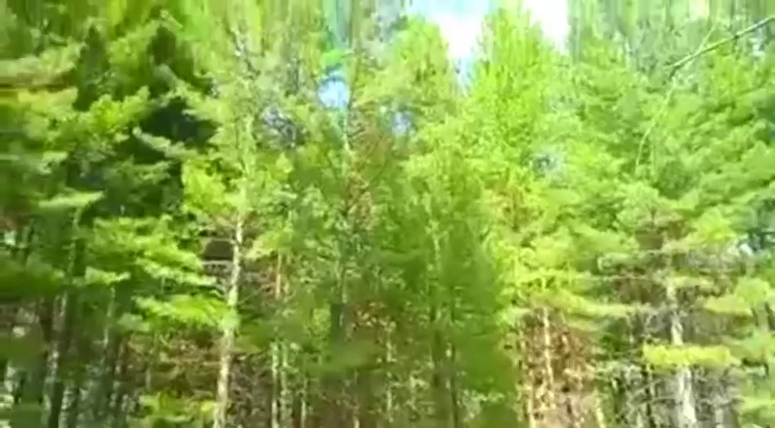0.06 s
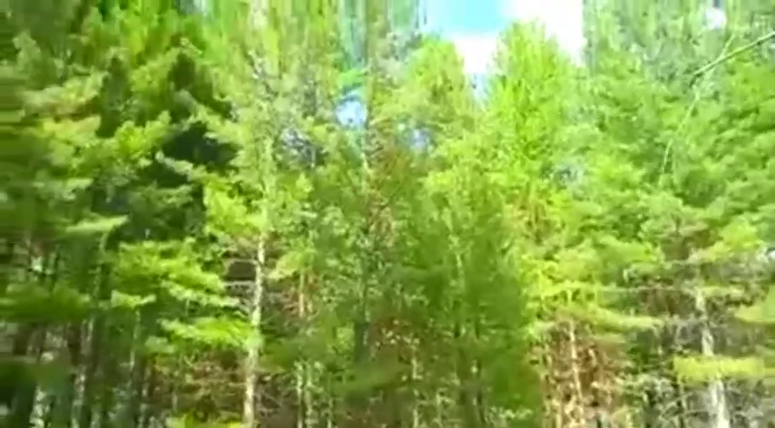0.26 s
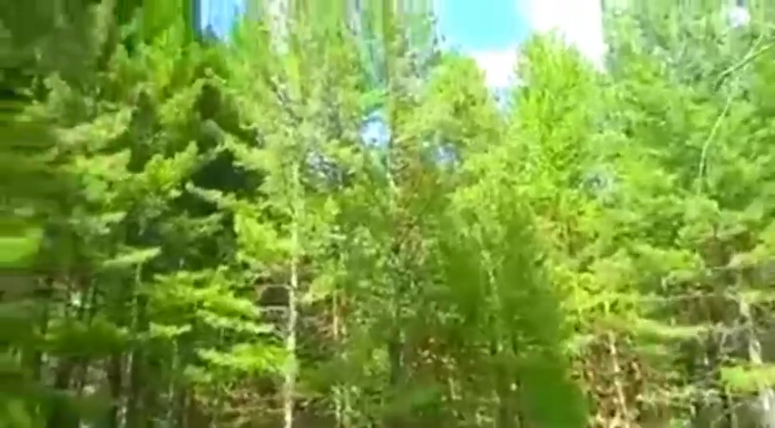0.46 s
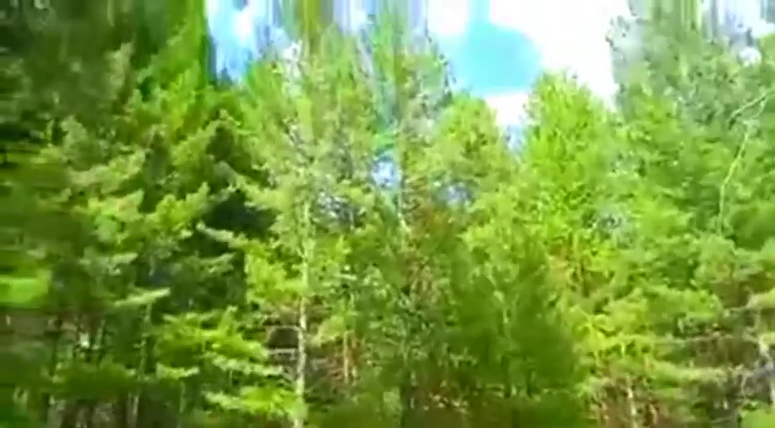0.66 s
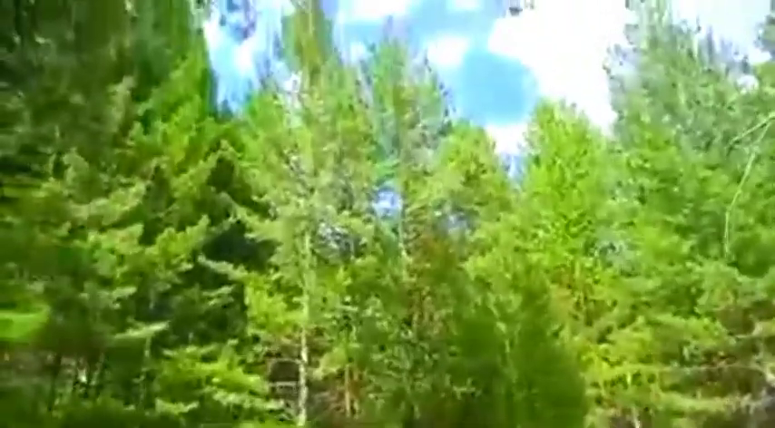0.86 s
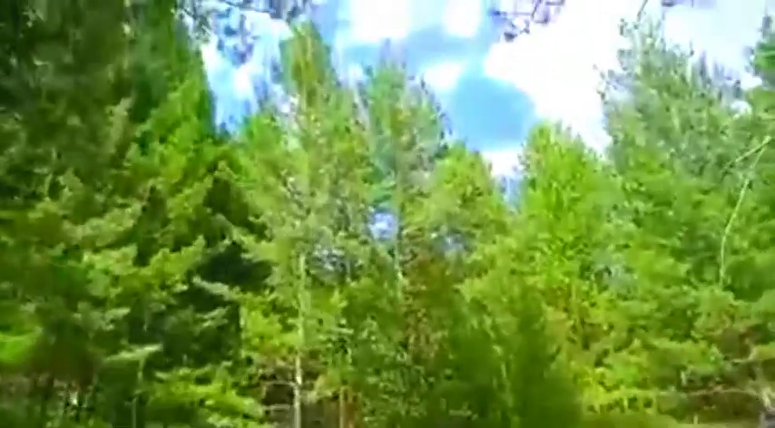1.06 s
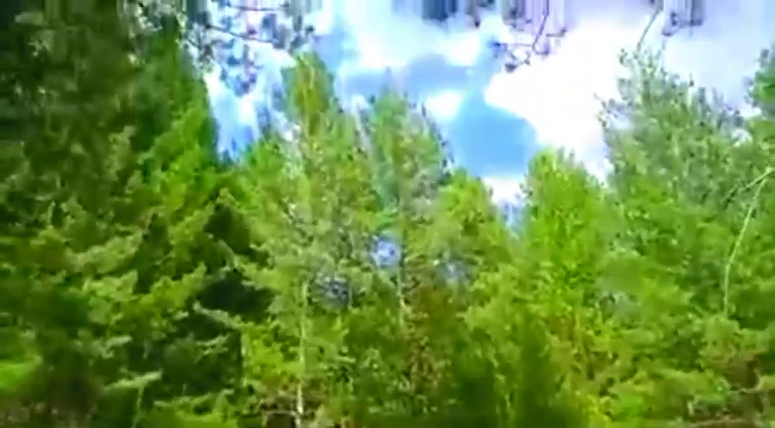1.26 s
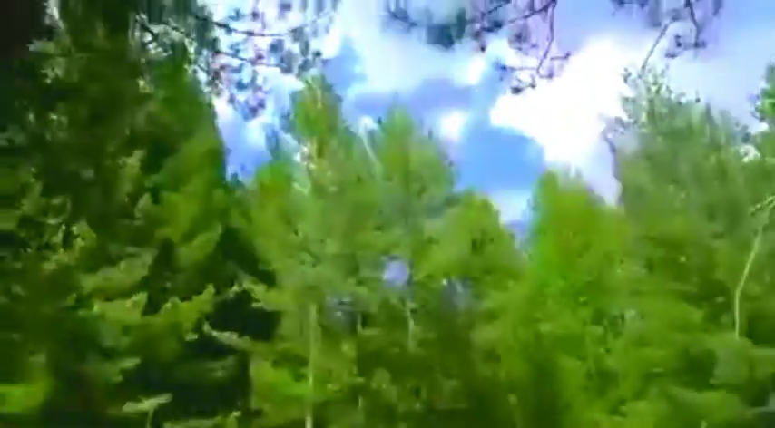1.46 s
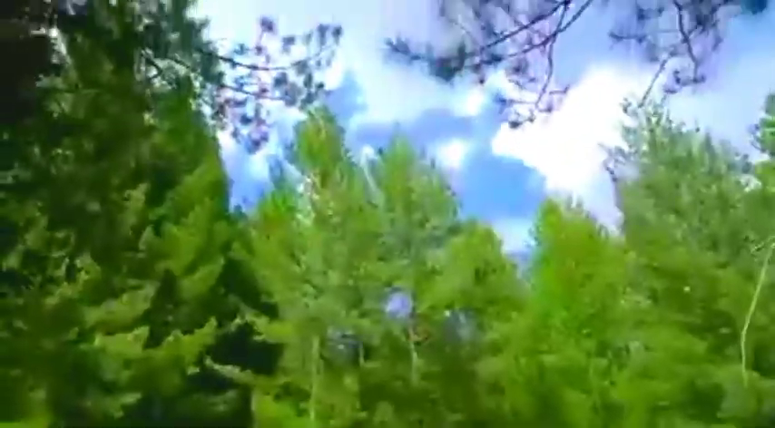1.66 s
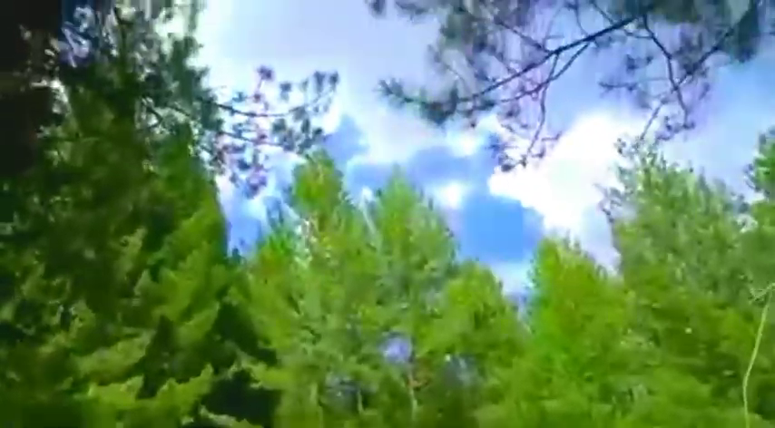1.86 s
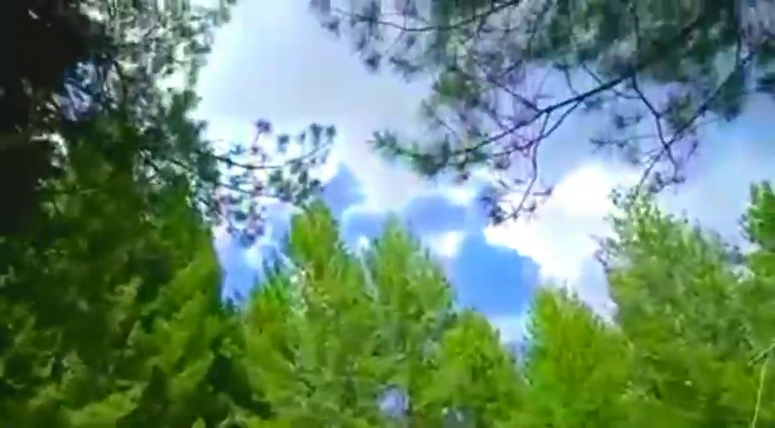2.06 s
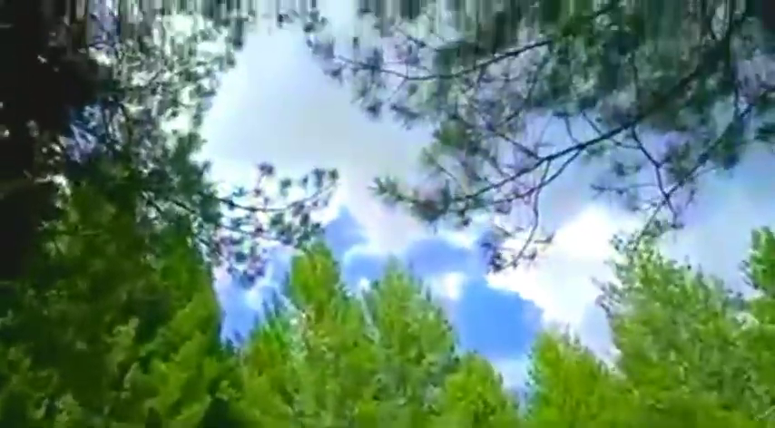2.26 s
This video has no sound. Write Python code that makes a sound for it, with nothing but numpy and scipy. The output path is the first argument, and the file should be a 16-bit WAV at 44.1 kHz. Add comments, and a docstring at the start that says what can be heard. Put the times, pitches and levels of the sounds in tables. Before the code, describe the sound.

Wind buffeting the microphone in low puffs over a soft hiss of pine trees.

```python
"""In a stand of pines, steady wind draws a broad hiss from the needles, with a low murmur under it.
Turbulent puffs rumble on the microphone's port: the faster the air, the higher the rumble reaches.
Where the flow holds steady, vortices shed from the camera add a low flutter.
Now and then a single strong eddy strikes the port, and its pulse of suction makes a soft thump."""
import sys
import numpy as np
from scipy import signal
from scipy.fft import rfft, irfft, next_fast_len
from scipy.io import wavfile
from scipy.ndimage import uniform_filter1d, map_coordinates

SR = 44100
rng = np.random.default_rng(int(sys.argv[2]) if len(sys.argv) > 2 else 0)


def generate_wav(sig):
    """Save sig (samples, or channels by samples) to the path in sys.argv[1] as 16-bit PCM at SR."""
    pcm = np.round(np.clip(np.atleast_2d(sig).T, -1, 1) * 32767).astype(np.int16)
    wavfile.write(sys.argv[1], SR, pcm)


N = 101429
T = np.arange(N) / SR


def amp(db):
    """Amplitude ratio of a level: tenfold for every 20 dB."""
    return 10 ** (np.asarray(db) / 20)


def unit(x):
    """Normalisation to an rms of 1."""
    return x / np.sqrt(np.mean(x ** 2) + 1e-20)


def wobble(rate_hz):
    """Smooth random modulation: a spline through rate_hz Gaussian values a second."""
    return map_coordinates(rng.standard_normal(int(N * rate_hz / SR) + 4), [T * rate_hz])


def gate(start_s, length_s, attack_s=0.007, release_s=0.019):
    """Amplitude envelope of passing air: it rises, holds and falls away."""
    rise = .5 + .5 * np.tanh(2 * (T - start_s) / attack_s)
    fall = .5 - .5 * np.tanh(2 * (T - start_s - length_s) / release_s)
    return rise * fall


def filtered(x, response):
    """Linear filtering: the spectrum of x is multiplied by a complex frequency response."""
    size = next_fast_len(N + 8192)
    hz = np.fft.rfftfreq(size, 1 / SR)
    return irfft(rfft(x, size) * response(hz), size)[:N]


def coloured(x, spectrum):
    """Spectral shaping by (frequency_hz, relative_db) points, normalised to an rms of 1."""
    points_hz, db = np.transpose(spectrum)
    return unit(filtered(x, lambda hz: amp(np.interp(np.log(hz + 1), np.log(points_hz), db))))


def port_response(hz, bass_cut_hz=111.4, q=0.88, rumble_cut_hz=64):
    """The microphone loses bass through two second-order high-pass stages in series."""
    s, r = 1j * hz / bass_cut_hz, 1j * hz / rumble_cut_hz
    return s * s / (s * s + s / q + 1) * r * r / (r * r + r + 1)


def high_hiss():
    """Amplitude-modulated noise: a very faint, high hiss sinks and slowly returns."""
    # spectrum of the hiss: frequency_hz, relative_db
    spectrum = [(5000, -31), (7700, 0.5), (9500, 0), (10100, -4), (11000, 5), (11800, 1.5), (12300, 4.5),
                (14000, 2), (15000, -10), (15500, -1.5)]
    # loudness contour of the hiss: time_s, level_db
    contour = [(0, -81.5), (.2, -82.5), (.36, -87.5), (1.1, -84), (2.3, -80.5)]
    return coloured(rng.standard_normal(N), spectrum) * amp(np.interp(T, *np.transpose(contour)))


def pine_needles(level_db=-47.5, patch_db=1.0, treble_hz=2800):
    """Flow noise from countless needles sums incoherently to a hiss, which brightens towards the end."""
    # spectrum of the needles' rush: frequency_hz, relative_db
    spectrum = [(25, -34.5), (60, -13), (200, 0), (420, 1.5), (620, 0), (1150, -0.5), (1450, -3.5),
                (1800, -1.8), (2050, -4.5), (2280, -11), (3150, -11), (3600, -14.5), (4450, -15),
                (5050, -19.5), (5600, -18.5), (6000, -27), (6550, -27.5), (7100, -34.5), (7400, -48.5),
                (9000, -61), (15000, -80)]
    # gain of the band above treble_hz: time_s, gain_db
    treble_contour = [(0, -0.9), (1.1, -1.3), (2.15, 0), (2.26, 1)]
    spectrogram = signal.stft(rng.standard_normal(N), nperseg=512)[2]
    patches = uniform_filter1d(rng.standard_normal(spectrogram.shape), size=6, axis=0)  # over frequency
    patches = uniform_filter1d(patches, size=16, axis=1)  # over time
    patchy_noise = signal.istft(spectrogram * amp(patch_db * unit(patches)), nperseg=512)[1][:N]
    rush = coloured(patchy_noise, spectrum)
    treble = filtered(rush, lambda hz: 1 - 1 / (1 + (hz / treble_hz) ** 4))
    treble_gain = amp(np.interp(T, *np.transpose(treble_contour)))
    return amp(level_db) * (rush + treble * (treble_gain - 1))


def vortex_shedding(rate_wander=0.1617, roughness_db=2.5):
    """In steady flow, vortices leave the camera's edge almost periodically and make a low flutter."""
    # spells of steady flow: start_s, length_s, level_db, pitch_hz
    spells = [(0.424, 0.094, -30.5, 160), (0.596, 0.071, -34.5, 140), (.724, 0.025, -26, 145.1),
              (0.743, 0.036, -36, 162)]
    out = np.zeros(N)
    for start_s, length_s, level_db, pitch_hz in spells:
        rate_hz = pitch_hz * np.exp(rate_wander * wobble(120))
        phase = 2 * np.pi * np.cumsum(rate_hz) / SR
        envelope = amp(level_db + roughness_db * wobble(79.2)) * gate(start_s, length_s)
        out += envelope * unit(np.sin(phase))
    return out


def eddy_thumps(falloff=3.9):
    """An eddy's low-pressure core passes as one pulse; a smaller, faster eddy thumps higher."""
    # strong eddies striking the port: time_s, peak_db, centre_hz
    eddies = [(0.243, -26, 167), (.333, -24, 260), (0.370, -16.5, 276), (0.429, -24, 186), (.516, -23, 150),
              (0.716, -16, 149), (.859, -25, 260), (.894, -20.5, 407), (0.9007, -17.5, 450),
              (0.9034, -13.5, 342), (.919, -25, 138), (0.935, -24, 320), (1.154, -24.5, 366),
              (1.159, -17.5, 278), (1.165, -25.5, 375), (1.196, -22, 170), (1.585, -30, 250),
              (1.604, -31.5, 199), (1.787, -33, 217), (1.943, -19, 124), (2.0, -28.5, 160)]
    out = np.zeros(N)
    for time_s, peak_db, centre_hz in eddies:
        distance = 2 * np.pi * centre_hz * (T - time_s)  # from the core, dimensionless
        suction = (1 + distance ** 2 / (2 * falloff)) ** -falloff
        thump = filtered(-suction, lambda hz: port_response(hz) * 1j * hz / (centre_hz + 1j * hz))
        out += amp(peak_db) * thump / np.abs(thump).max()
    return out


def turbulence(corner_hz, order=3.75):
    """Turbulent pressure on the port: noise of even strength that falls steeply above its corner."""
    def response(hz):
        return port_response(hz) / np.sqrt(1 + (hz / corner_hz) ** (2 * order))

    pressure = unit(filtered(rng.standard_normal(N), response))
    local_power = np.abs(uniform_filter1d(pressure ** 2, size=1100))
    return pressure / np.sqrt(local_power + 0.015)


def buffeting(draught_db=-53, swing_db=4, puff_gain_db=1, roughness_db=2):
    """Pressure fluctuations of a light draught and of brief puffs act directly on the port as rumble."""
    # puffs of air on the port: start_s, length_s, relative_db, corner_hz
    puffs = [(0.0, 0.053, -46, 168), (0.113, 0.033, -52, 147), (0.163, 0.075, -42, 171),
             (0.239, 0.074, -33.5, 196), (0.313, 0.099, -34, 264), (0.409, 0.068, -34, 225),
             (0.469, 0.061, -32, 220), (0.534, 0.028, -30.5, 210), (0.565, 0.026, -29.5, 283),
             (0.594, 0.058, -35.5, 250), (0.671, 0.044, -39.5, 160), (0.701, 0.042, -29.5, 220),
             (0.753, 0.029, -34, 233), (0.785, 0.053, -40, 250), (0.84, 0.076, -35.5, 190),
             (0.856, 0.021, -28, 435), (.882, 0.013, -32.5, 520), (0.907, 0.021, -39.5, 290),
             (0.936, .025, -45, 250), (1.089, 0.069, -47, 266), (1.153, 0.021, -33.5, 476),
             (1.182, 0.031, -41.5, 270), (1.488, 0.02, -41.5, 171), (1.57, 0.051, -38, 290),
             (1.723, 0.008, -40, 250), (1.745, 0.029, -40, 270), (1.783, 0.03, -40, 240),
             (1.986, 0.035, -38, 190), (2.03, 0.076, -49, 166)]
    out = turbulence(corner_hz=117) * amp(draught_db + swing_db * wobble(9.15))
    flutter = amp(puff_gain_db + roughness_db * wobble(69.78))
    for start_s, length_s, relative_db, corner_hz in puffs:
        out += amp(relative_db) * gate(start_s, length_s) * flutter * turbulence(corner_hz)
    return out


def scene():
    """Superposition, in one channel, of the trees all around and the air on the microphone."""
    return (pine_needles() + high_hiss() + buffeting() + vortex_shedding() + eddy_thumps())[None]


def record(dry, band_limit_hz=15700):
    """Band limiting: the camera's steep low-pass filter removes the highest treble."""
    return signal.sosfilt(signal.ellip(12, .1, 80, band_limit_hz, fs=SR, output="sos"), dry)


dry = scene()
out = record(dry)
generate_wav(out)
```